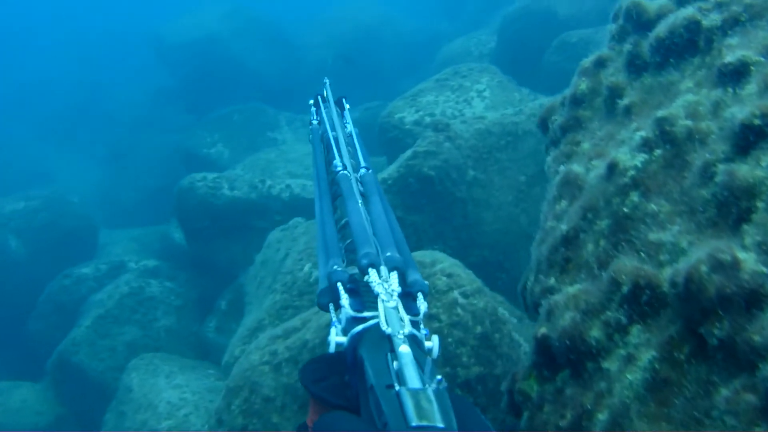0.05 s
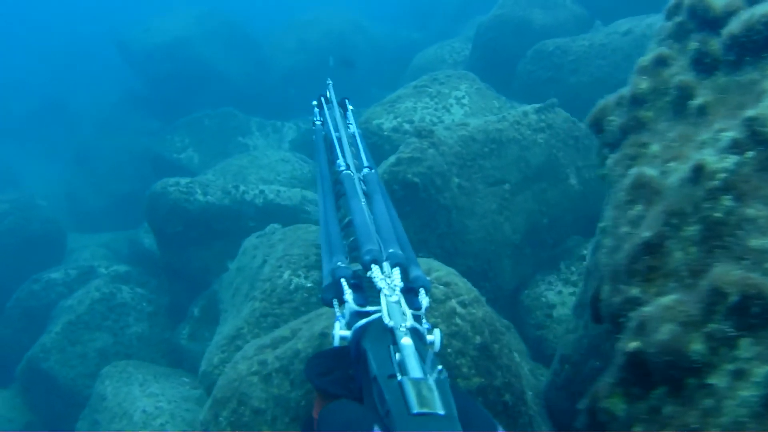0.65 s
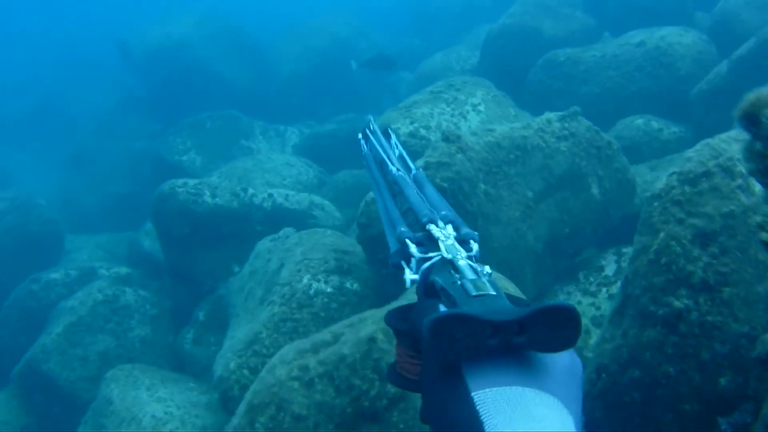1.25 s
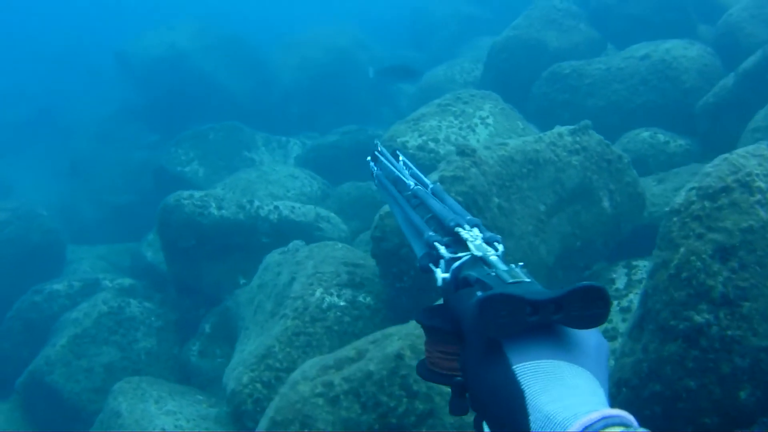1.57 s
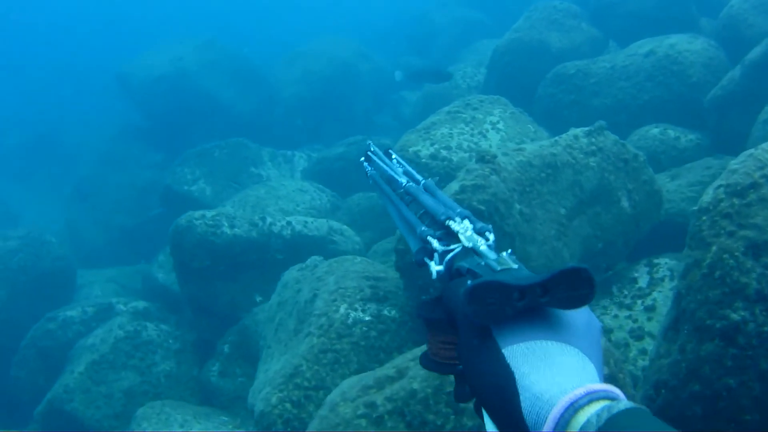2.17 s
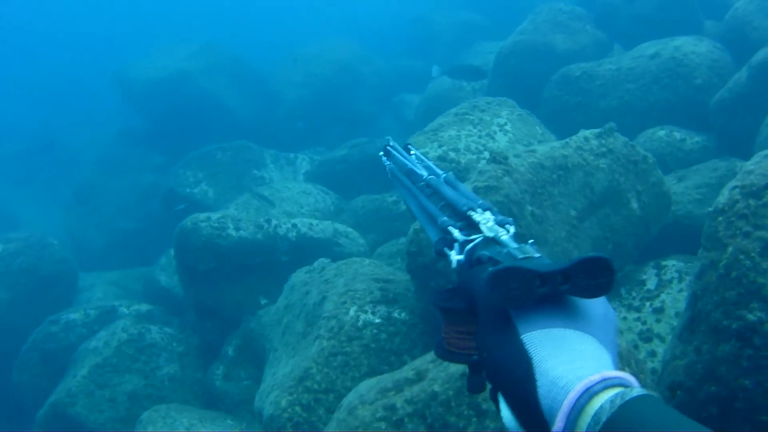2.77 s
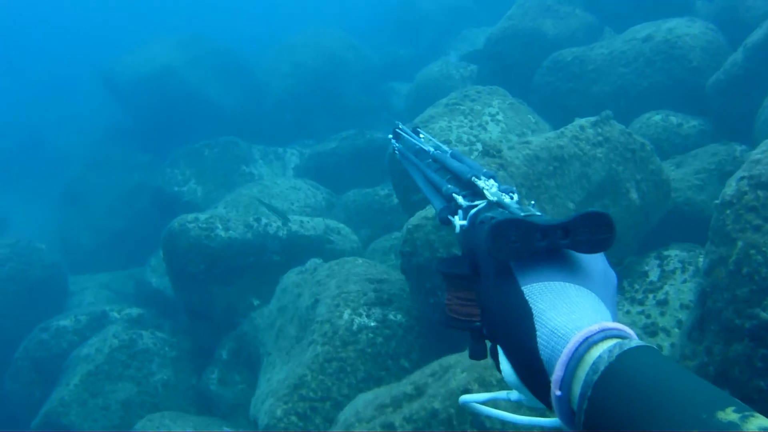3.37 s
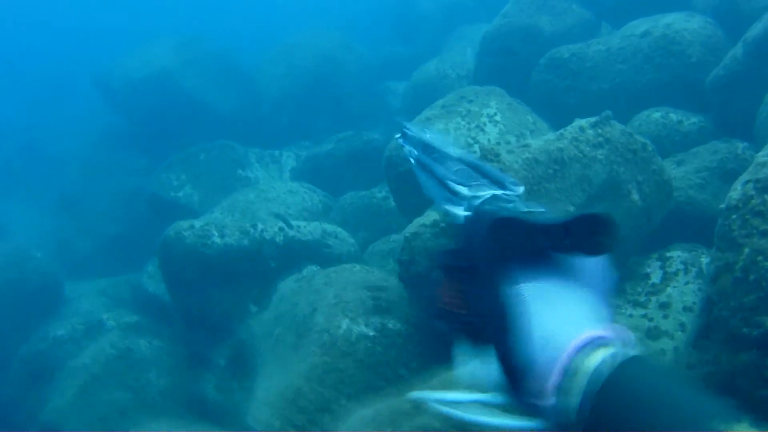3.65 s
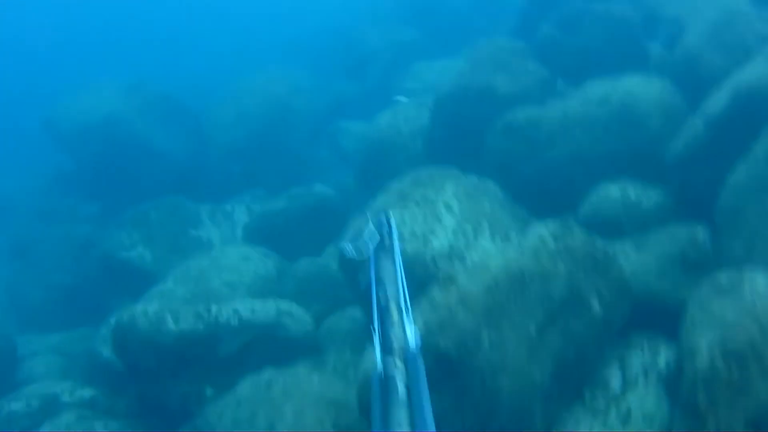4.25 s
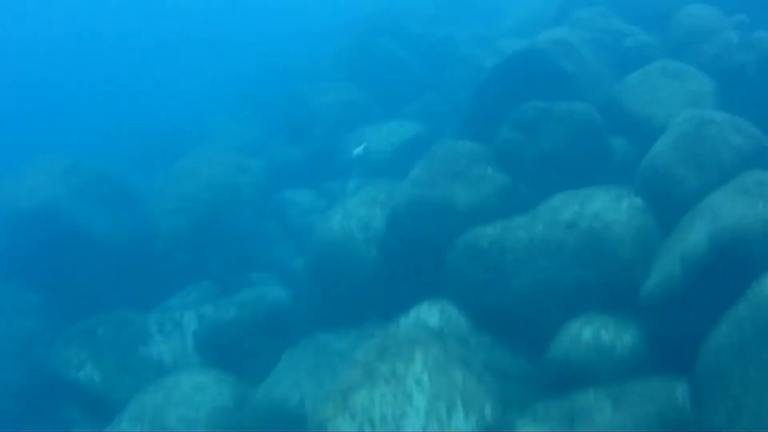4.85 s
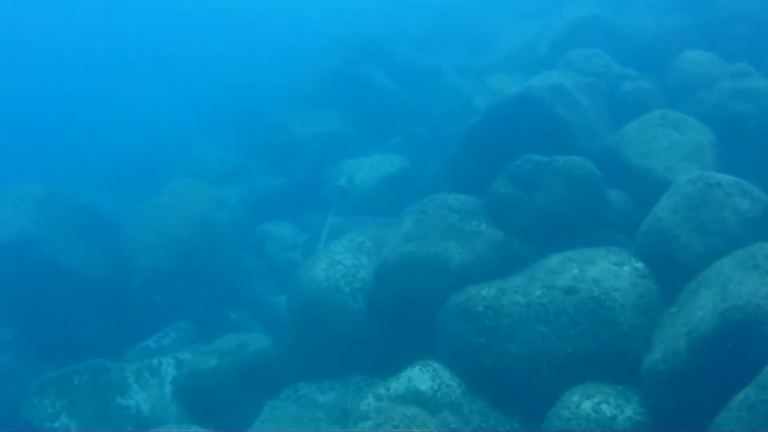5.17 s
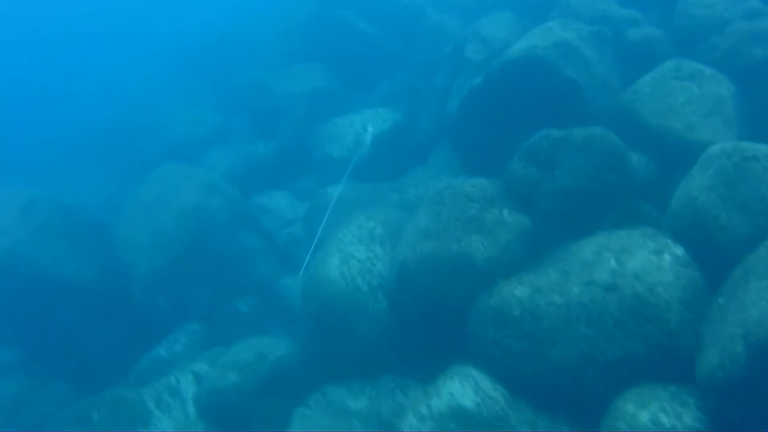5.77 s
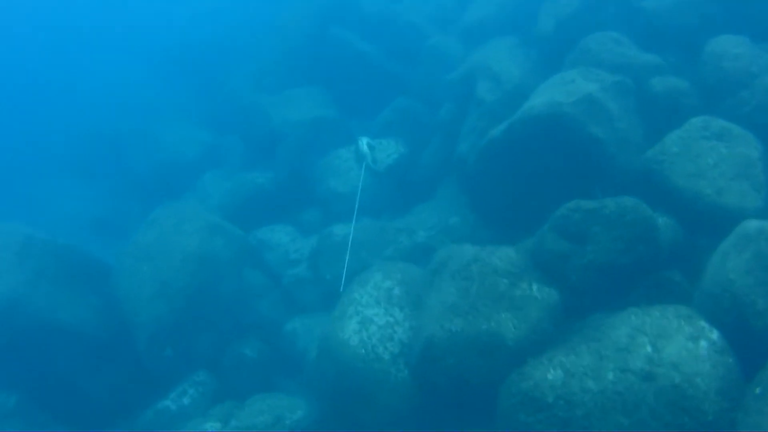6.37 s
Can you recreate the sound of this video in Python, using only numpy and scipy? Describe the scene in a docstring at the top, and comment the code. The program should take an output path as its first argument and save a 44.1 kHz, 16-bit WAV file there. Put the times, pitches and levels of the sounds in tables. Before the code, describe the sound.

Shrimp crackle over a soft underwater hiss, then a speargun fires with a loud clack, followed by gear knocks and a few small bubbles.

```python
"""Under water over a rocky seabed, heard from inside a camera's waterproof housing.
Snapping shrimp crackle over the low wash of the sea, their pulses scattered by the rocks and filtered by
the housing wall. A band speargun fires: the trigger clicks, the shaft rasps along its track, the bands
slap home and ring the barrel, and the recoil shakes the water. Gear then knocks against the housing,
exciting its damped modes, and a few bubbles gurgle as their pockets of air pulsate."""
import sys
import numpy as np
from scipy import signal
from scipy.fft import rfft, irfft, next_fast_len
from scipy.io import wavfile
from scipy.ndimage import uniform_filter1d

SR = 44100
rng = np.random.default_rng(int(sys.argv[2]) if len(sys.argv) > 2 else 0)


def inscribe(sig):
    """Save sig as 16-bit PCM at rate SR to the path in sys.argv[1].

    A 1-D sig is mono; a 2-D sig holds one channel per row.
    Samples are clipped to [-1, 1] before scaling.
    """
    pcm = np.round(np.clip(np.atleast_2d(sig).T, -1, 1) * 32767)
    wavfile.write(sys.argv[1], SR, pcm.astype(np.int16))


N = 286650
TIME = np.arange(N) / SR
EVENT_TIME = np.arange(SR // 3) / SR  # time axis of one short event
FIRE_S, HOME_S = 3.5938, 3.6271  # the trigger lets go; the bands slap home


def undb(db):
    """Amplitude ratio of a level in decibels."""
    return 10 ** (np.asarray(db) / 20)


def level(x, db):
    """Normalisation to an rms level."""
    return x * undb(db) / np.sqrt(np.mean(x ** 2))


def add(out, start_s, sound):
    """Superposition of a sound at its onset time."""
    i = int(round(start_s * SR))
    out[i:i + len(sound)] += sound[:max(N - i, 0)]


def decay(t60):
    """Exponential damping by 60 dB in t60 seconds."""
    return np.exp(-np.log(1000) * EVENT_TIME / t60)


def colour(x, response):
    """Minimum-phase filtering to (f/Hz, gain/dB) points, by folding the cepstrum."""
    n = 2 * next_fast_len(len(x) // 2 + 1024)
    hz, db = np.transpose(response)
    bin_hz = np.arange(n // 2 + 1) * SR / n
    gain = undb(np.interp(np.log(bin_hz + 1), np.log(hz), db))
    cepstrum = irfft(np.log(gain))
    cepstrum[1:n // 2] *= 2
    cepstrum[n // 2 + 1:] = 0
    return irfft(rfft(x, n) * np.exp(rfft(cepstrum)))[:len(x)]


def band(x, hz, octaves):
    """Second-order band-pass about a centre frequency."""
    edges = np.minimum(hz * 2 ** (np.array([-.5, .5]) * octaves), [.4 * SR, .48 * SR])
    return signal.sosfilt(signal.butter(1, edges, "bandpass", fs=SR, output="sos"), x + 1e-18)


def wander(rate_hz):
    """Smooth random modulation of unit rms."""
    hold = int(SR / rate_hz)
    steps = np.repeat(rng.standard_normal(N // hold + 1), hold)
    return level(uniform_filter1d(steps, hold)[:N], 0)


def swells(rows):
    """Power sum of envelopes that rise and fall exponentially about their peaks."""
    return np.sqrt(sum(undb(db - rise * np.maximum(s - TIME, 0) - fall * np.maximum(TIME - s, 0)) ** 2
                       for s, db, rise, fall in rows))


def ring(modes, pitch=1, place=0, unevenness=0):
    """Modal superposition: neighbouring modes alternate in sign, and the place struck favours some."""
    sound = np.zeros(len(EVENT_TIME))
    for k, (hz, db, t60) in enumerate(modes):
        weight = (-1) ** k * (1 + unevenness * np.cos(np.pi * k * place))
        sound += weight * undb(db) * decay(t60) * np.sin(2 * np.pi * hz * pitch * EVENT_TIME)
    return sound


def swing(peak_db, hz, t60, glide=0.05, attack_s=0.0038):
    """Damped oscillation of a mass of water, rising in pitch as it dies."""
    phase = 2 * np.pi * np.cumsum(hz * (1 + glide * EVENT_TIME / t60)) / SR
    sound = np.sin(phase) * decay(t60) * (1 - np.exp(-EVENT_TIME / attack_s))
    return undb(peak_db) * sound / np.abs(sound).max()


def click_t60(hz):
    """Damping grows with frequency: the brighter a click, the shorter its decay time."""
    return 0.03 * (3300 / hz) ** 1.36


# Spectrum of the sea's wash: f/Hz, relative spectral level/dB
WASH_SPECTRUM = [(20, -6), (45, -3), (90, -3.5), (160, -1), (350, -3), (650, -6.5), (1000, -11.5),
                 (1500, -16), (2200, -20), (4800, -27), (9000, -31), (15500, -35.5)]
def sea(wash_db=-53.5, flicker_db=0.9):
    """Broadband noise, strongest at low frequencies, with slight random amplitude modulation."""
    wash = level(colour(rng.standard_normal(N), WASH_SPECTRUM), wash_db)
    return wash * undb(flicker_db * wander(rate_hz=11))


# Flow as the diver aims, then swims after the shaft: peak t/s, level/dB, rise/(dB/s), fall/(dB/s)
SURGES = [(1.0, -53, 21, 4.5), (3.75, -42.5, 100, 3.6)]
def surge(hz=11.9, octaves=0.99):
    """Water pushing round the housing gives slow, mostly infrasonic pressure fluctuations."""
    pressure = band(band(rng.standard_normal(N), hz, octaves), hz, octaves)
    return level(pressure, 0) * swells(SURGES)


# Transmission of the housing wall: f/Hz, gain/dB
WALL_RESPONSE = [(500, -20), (1900, -7), (2850, 2.5), (3120, -5), (3420, -0.5), (4200, -2.5), (4950, -13.5),
                 (6350, 0.5), (6950, -9.5), (8100, -7.5), (10200, -13), (11200, -10), (12100, -19),
                 (15500, -16.5)]
def through_wall(x):
    """Transmission through a wall is greatest at its resonances, which colour every sharp sound."""
    return colour(x, WALL_RESPONSE)


def crack(db, hz, t60, octaves):
    """Scattering spreads a pulse into a decaying band of noise, heard through the wall."""
    envelope = decay(t60)[:SR // 8]
    burst = rng.standard_normal(len(envelope)) * envelope
    sound = through_wall(band(band(burst, hz, octaves), hz, octaves))
    return level(sound, db) * np.sqrt(np.mean(envelope ** 2))


def colony(per_s, spread_db, hz, octaves, scatter_t60, scatter_db):
    """A Poisson process of unequal snaps, each trailed by incoherent scatter from the rocks."""
    onsets = rng.random(N) < per_s / SR
    size = np.minimum(rng.exponential(size=N), 4)
    pulses = onsets * undb(spread_db * size) * rng.choice([-1, 1], N)
    scatter_power = np.abs(signal.oaconvolve(pulses ** 2, decay(scatter_t60) ** 2)[:N])
    scatter = undb(scatter_db) * np.sqrt(scatter_power) * rng.standard_normal(N)
    return band(pulses + scatter, hz, octaves)


# Contour of the shrimp's sizzle, to be stretched about its mean: t/s, relative level/dB
SIZZLE = [(0.0, -67.5), (1.33, -68), (1.87, -66), (2.59, -68), (2.8, -66.5), (3.15, -66.5), (3.5, -66),
          (4.25, -66.5), (4.61, -68), (5.62, -66.5), (6.01, -67), (6.19, -65.5), (6.45, -66)]
def shrimp(flurry_db=1.0, gain_db=-1.6, contour_stretch=1.7):
    """Dense distant snaps superpose into a sizzle; sparser near ones stand out in three bands."""
    far = colony(per_s=2500, spread_db=0.5, hz=6500, octaves=2.7, scatter_t60=.015, scatter_db=-16)
    dull = colony(per_s=60, spread_db=1.8, hz=3250, octaves=.81, scatter_t60=.034, scatter_db=-18)
    bright = colony(per_s=60, spread_db=2.0, hz=6500, octaves=.79, scatter_t60=.017, scatter_db=-11)
    sharp = colony(per_s=35, spread_db=2.8, hz=10000, octaves=.6, scatter_t60=.012, scatter_db=-15)
    chorus = level(far, -60.5) + level(dull, -63.5) + level(bright, -62) + level(sharp, -62)
    contour = np.interp(TIME, *np.transpose(SIZZLE))
    drift_db = contour_stretch * (contour - contour.mean())
    return through_wall(chorus) * undb(gain_db + drift_db + flurry_db * wander(rate_hz=10))


# The loudest shrimp snaps, far ones duller: t/s, level/dB, centre f/Hz
LOUD_SNAPS = [(.104, -45, 3400), (.292, -43, 5000), (0.302, -43.5, 3280), (.459, -49, 7500),
              (.492, -48.5, 4170), (.950, -52, 3020), (1.125, -50, 8000), (1.317, -51, 3400),
              (1.468, -45, 8500), (1.521, -45, 5000), (1.565, -48.5, 4000), (1.599, -47, 3870),
              (1.712, -48.5, 3480), (1.729, -36.5, 13200), (1.802, -48.5, 4200), (1.997, -47, 3960),
              (2.02, -46.5, 8000), (2.238, -48.5, 10000), (2.3865, -38, 6000), (2.531, -46.5, 3400),
              (2.543, -46, 3150), (2.611, -47, 3230), (2.618, -44.5, 3500), (2.645, -51, 3400),
              (2.7075, -46.5, 3900), (3.027, -50.5, 3700), (3.049, -38, 6200), (4.164, -45.5, 3800),
              (4.1848, -36, 8900), (4.193, -43.5, 7000), (4.783, -48, 3200), (4.959, -48, 6200),
              (5.283, -47, 6000), (5.56, -43, 3470), (5.655, -49.5, 3900), (6.199, -47.5, 5000),
              (6.216, -43.5, 3400), (6.361, -40, 5600)]
def snaps(scatter_db=-13, scatter_stretch=4.5):
    """Each direct pulse is trailed by weaker, longer reverberation from the rocks."""
    out = np.zeros(N)
    for s, db, hz in LOUD_SNAPS:
        # dull snaps ping narrowly on the wall's lowest resonances; brighter ones spread wide
        octaves = np.interp(hz, [3300, 5000, 10000], [.55, 1.5, 1.3])
        add(out, s, crack(db, hz, click_t60(hz), octaves))
        add(out, s, crack(db + scatter_db, hz, scatter_stretch * click_t60(hz), octaves))
    return out


# Pockets of air: t/s, peak level/dB, f/Hz
AIR_POCKETS = [(1.426, -45, 150), (2.85, -48, 113), (3.624, -25, 141.5), (3.639, -28, 215),
               (3.73, -30, 231), (3.751, -35, 100), (4.635, -42.5, 133), (4.646, -41, 200),
               (5.955, -50, 110), (5.606, -37.5, 680), (5.628, -45.5, 718), (6.077, -45, 917),
               (6.082, -41.5, 700)]
def bubbles():
    """Volume resonance: air is the spring and water the mass; large, low bubbles ring longest."""
    out = np.zeros(N)
    for s, db, hz in AIR_POCKETS:
        add(out, s, swing(db, hz, t60=0.088 * (150 / hz) ** 0.35))
    return out


# Low modes of the housing: f/Hz, relative level/dB, T60/s
HOUSING_MODES = [(647, 3, 0.031), (890, 1, 0.018), (1075, -7, 0.027), (1371, -2, 0.026), (1720, -8, 0.025),
                 (1886, -15.5, 0.026), (2180, -11.5, 0.027), (2510, -13, 0.013), (2860, -6.5, 0.0097),
                 (3470, -10, 0.014), (4240, -7, 0.0056), (6800, -15, 0.0057)]
def housing(db, contact_hz, pitch, place):
    """Impact response of a water-damped shell; soft contact acts as a low-pass filter."""
    motion = ring(HOUSING_MODES, pitch, place, unevenness=0.57)
    radiated = np.diff(motion, prepend=0)  # the wall radiates by its motion, so deep bass cancels
    sound = signal.sosfilt(signal.butter(3, contact_hz, fs=SR, output="sos"), radiated + 1e-18)
    return sound * undb(db) / np.sqrt(np.sum(sound ** 2) / (.01 * SR))  # energy taken over 10 ms


# Gear striking the housing:
# t/s, level/dB, contact cut-off f/Hz, pitch ratio, rebound delay/s, rebound ratio, place on wall (0-1)
GEAR_IMPACTS = [(1.1235, -48, 1440, .97, .002, .3, .93), (3.6666, -31.5, 1690, 1.13, .0029, 0.8, 0),
                (3.673, -27.5, 1340, 1.03, .0069, .2, .47), (3.691, -28, 1910, 1.12, 0.00178, 1, 0.6),
                (3.6986, -26, 1860, 1.03, .00385, .1, .87), (3.7294, -21, 1750, 1.006, 0.0021, 0.25, 0.43),
                (3.797, -40.5, 1330, 0.87, .00426, 0.37, 0.42),
                (3.9177, -33.5, 1170, 1.04, .0034, .32, 0.8),
                (3.9508, -21.5, 1640, 1.017, 0.0008, 0.6, .23),
                (3.9814, -19, 1750, 1.034, 0.00093, 0.39, .54), (4.0792, -30.5, 1320, 1.07, .00621, 1, .83),
                (4.0838, -16, 3100, 1.017, 0.0038, .52, 0), (4.3757, -27.7, 2410, 1.074, 0.0018, .3, 0),
                (4.496, -34.4, 2600, .92, 0.00201, 0.3, 0.01), (4.8135, -37, 1110, 0.93, .00097, 1, 0),
                (4.8178, -29, 970, 1.14, .0024, 0.94, 0.06), (4.8198, -24.5, 1570, 1.043, 0.00369, 0.64, 0),
                (5.512, -31, 1500, 1.036, 0.0019, .4, 0), (5.607, -48.5, 1200, 1, .007, .47, 0.58),
                (5.63, -52, 1510, .88, .004, .37, 0)]
def knocks(thump_db=-15, tick_db=-20):
    """Each impact rings the housing, jolts it as a whole and rebounds; hard contact adds a tick."""
    out = np.zeros(N)
    for s, db, contact_hz, pitch, delay, rebound, place in GEAR_IMPACTS:
        knock = housing(db, contact_hz, pitch, place)
        thump = swing(db + thump_db, hz=184, t60=0.022)
        hardness = (contact_hz / 3000) ** 2.6
        tick = hardness * crack(db + tick_db, hz=8000, t60=0.014, octaves=1.2)
        add(out, s, knock + thump)
        add(out, s, tick)
        add(out, s + delay, rebound * knock)
    return out


# Kick, thud, heave and sway of the shot: t/s, peak level/dB, f/Hz, T60/s
RECOIL_SWINGS = [(3.593, -19.5, 72, .028), (3.627, -18, 510, 0.022), (3.640, -20.5, 67, 0.128),
                 (3.663, -23, 15.3, .41)]
def recoil():
    """Reaction to the shot sets the water and the camera into damped oscillation."""
    out = np.zeros(N)
    for s, db, hz, t60 in RECOIL_SWINGS:
        add(out, s, swing(db, hz, t60))
    return out


# Modes of the barrel and shaft: f/Hz, relative level/dB, T60/s
BARREL_MODES = [(563, 5, 0.032), (710, 5, 0.03), (796, -7, 0.038), (1360, 7, 0.025), (1480, -28, 0.047),
                (1658, -0.5, 0.057), (1990, -4.5, 0.057), (2270, -12, 0.063), (2850, -10, 0.087),
                (3340, -15, 0.07), (3720, -19, 0.087)]
def barrel():
    """Free vibration of the barrel and shaft after one blow, at unit peak."""
    clang = ring(BARREL_MODES)
    return clang / np.abs(clang).max()


# Spectrum of the friction: f/Hz, relative spectral level/dB
RASP_SPECTRUM = [(150, -25.5), (550, 9), (950, -18.5), (1500, 3), (2200, 4), (2900, 6), (4000, 3),
                 (4950, -11), (6500, 5), (7000, -8.5), (7800, -1), (9500, -18), (11200, -9), (15500, -36)]
# Shaft sliding, line running out, line pulling taut: peak t/s, gain/dB, rise/(dB/s), fall/(dB/s)
RUB_ENVELOPES = [(3.627, -21.5, 600, 650), (3.662, -33, 900, 304), (3.772, -40, 700, 700)]
def friction(chatter_db=3.5, taps_per_s=420):
    """Sliding friction makes chattering noise, while random taps briefly excite the barrel's modes."""
    chatter = rng.standard_normal(N) * undb(chatter_db * wander(rate_hz=500))
    rasp = colour(chatter, RASP_SPECTRUM)
    taps = (rng.random(N) < taps_per_s / SR) * rng.choice([-1, 1], N)
    rattle = signal.fftconvolve(taps, barrel() * decay(t60=0.014))[:N]
    return (level(rasp, -0.5) + level(rattle, -4)) * swells(RUB_ENVELOPES) * (TIME > FIRE_S)


# Resonances of the trigger catch: f/Hz, level/dB, T60/s, bandwidth/octaves
CATCH_BANDS = [(1700, -22, .007, 0.78), (3430, -10.5, .009, 0.31), (6500, -11.5, .0051, .44),
               (11000, -18.5, .0035, 1.6)]
def trigger():
    """Sudden release excites the catch's broad, heavily damped resonances."""
    out = np.zeros(N)
    for hz, db, t60, octaves in CATCH_BANDS:
        add(out, FIRE_S, crack(db, hz, t60, octaves))
    return out


# Sharp clicks: gun parts clattering at the shot, then the bright tick of a later housing knock:
# t/s, level/dB, centre f/Hz
SHARP_CLICKS = [(3.591, -35, 4500), (3.6075, -26, 7000), (3.6278, -13.5, 6800), (3.6374, -16, 4200),
                (3.655, -29, 9900), (3.6575, -25, 3200), (3.6835, -26, 8600), (3.726, -35, 9000),
                (3.729, -40, 7000), (3.752, -39, 4200), (3.763, -26, 2700), (4.496, -40, 6400)]
def slap_and_clicks(slap_ring_db=-5, click_ring_db=-16):
    """Impact excitation: the bands' slap and each sharp click are a crack plus the barrel's ring."""
    out = np.zeros(N)
    clang = barrel()
    add(out, HOME_S, crack(db=-8.5, hz=2630, t60=0.025, octaves=1.4))
    add(out, HOME_S, undb(slap_ring_db) * clang)
    for s, db, hz in SHARP_CLICKS:
        add(out, s, crack(db, hz, click_t60(hz), octaves=1.7))
        add(out, s, undb(db + click_ring_db) * clang)
    return out


def scene():
    """Linear superposition of all sources at the one microphone in the housing."""
    background = sea() + surge() + shrimp() + snaps()
    foreground = recoil() + friction() + trigger() + slap_and_clicks()
    return (background + bubbles() + knocks() + foreground)[None]


def record(dry, ceiling=0.52, cutoff_hz=15800):
    """Soft saturation in the camera flattens the loudest peaks; a steep low-pass limits the bandwidth."""
    rounded = dry / (1 + (dry / ceiling) ** 6) ** (1 / 6)
    return signal.sosfilt(signal.ellip(10, .1, 80, cutoff_hz, fs=SR, output="sos"), rounded)


dry = scene()
out = record(dry)
inscribe(out)
```